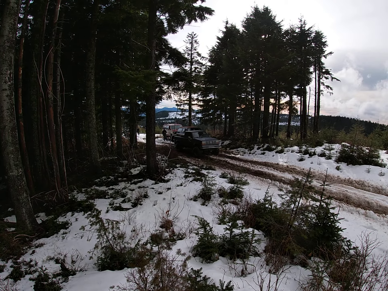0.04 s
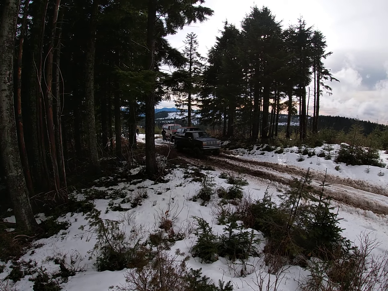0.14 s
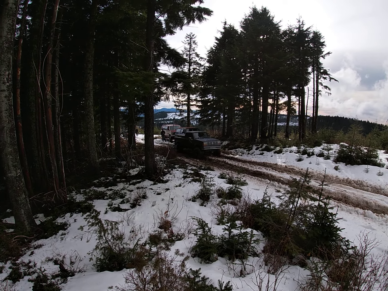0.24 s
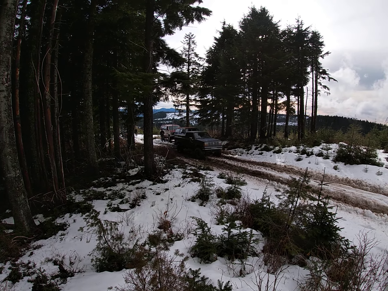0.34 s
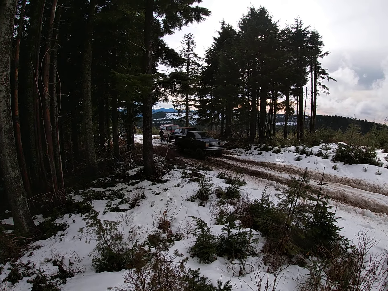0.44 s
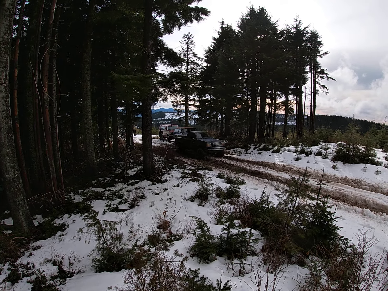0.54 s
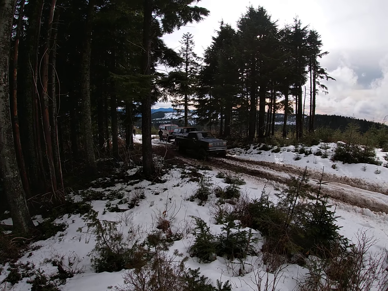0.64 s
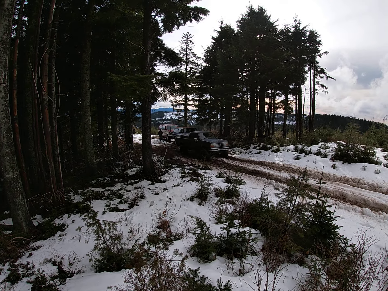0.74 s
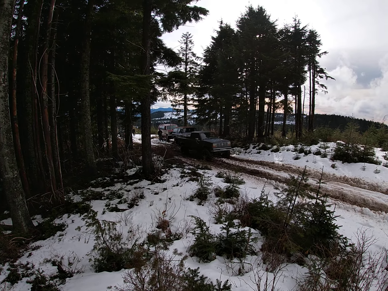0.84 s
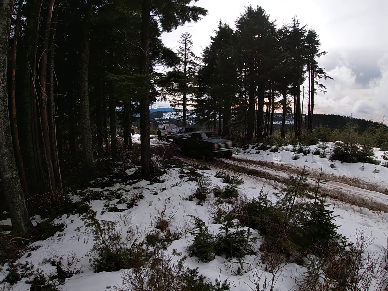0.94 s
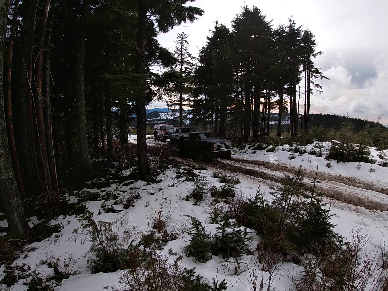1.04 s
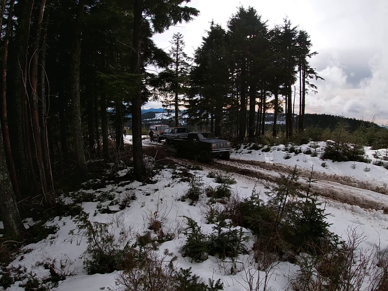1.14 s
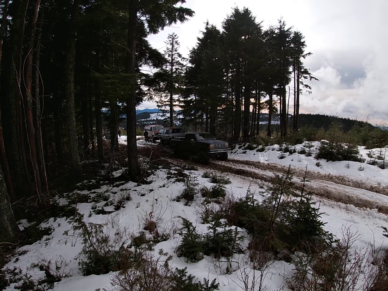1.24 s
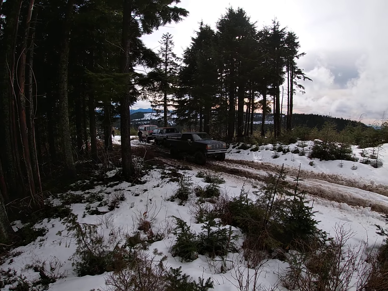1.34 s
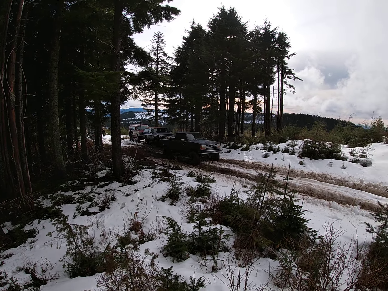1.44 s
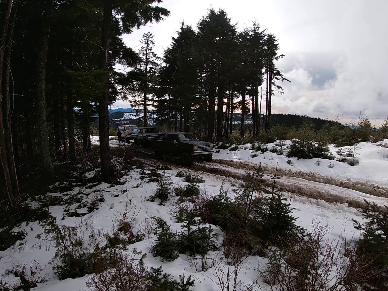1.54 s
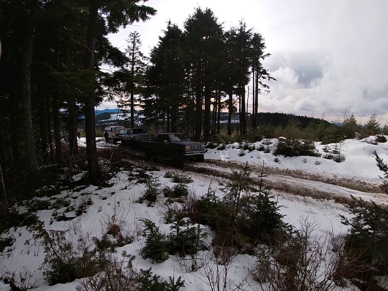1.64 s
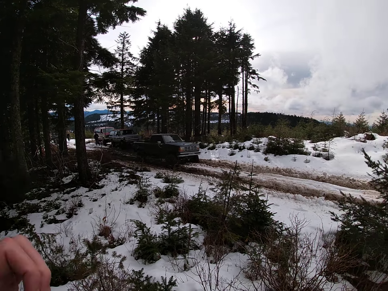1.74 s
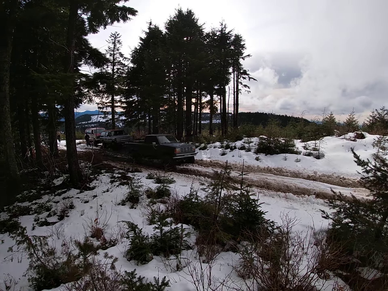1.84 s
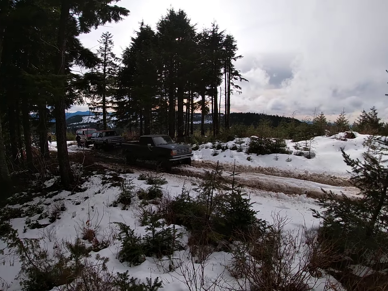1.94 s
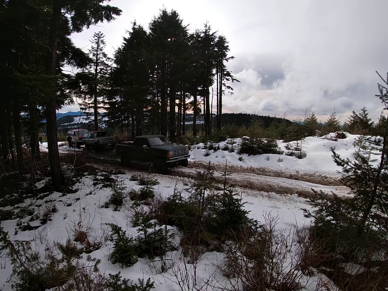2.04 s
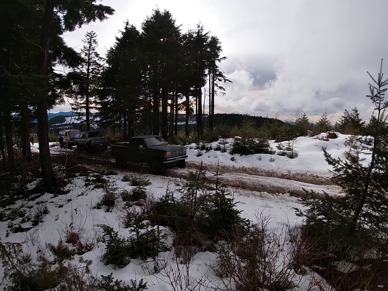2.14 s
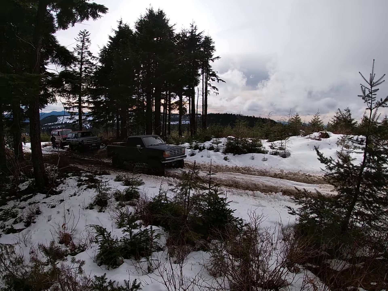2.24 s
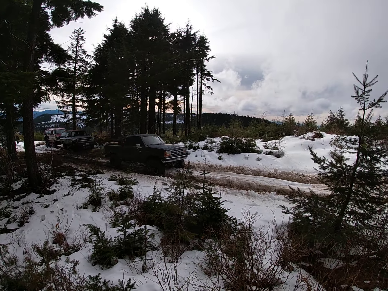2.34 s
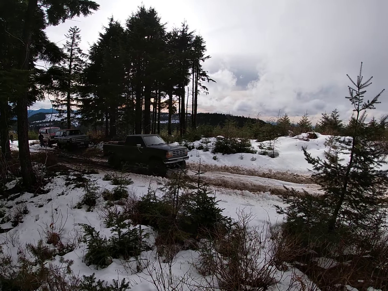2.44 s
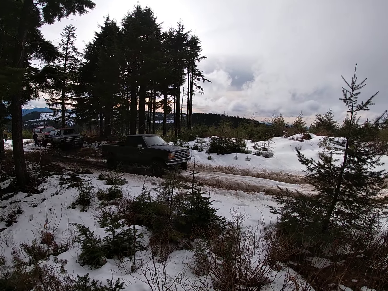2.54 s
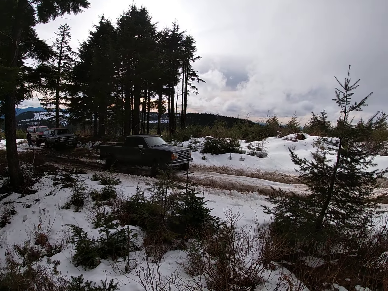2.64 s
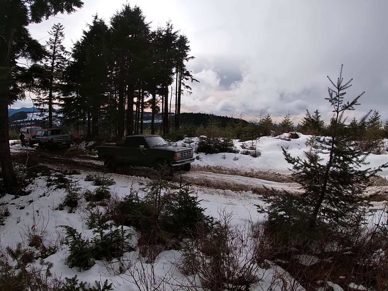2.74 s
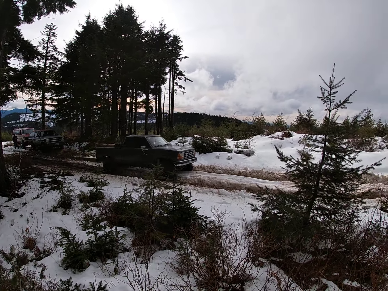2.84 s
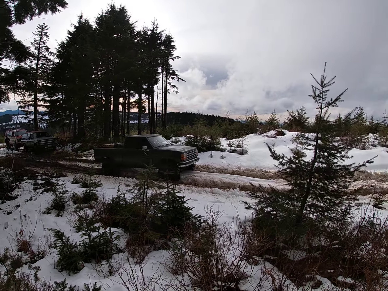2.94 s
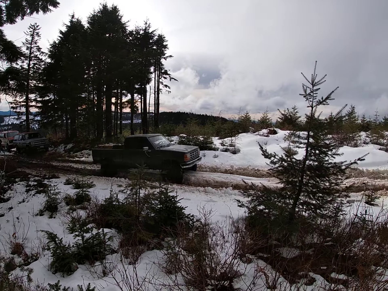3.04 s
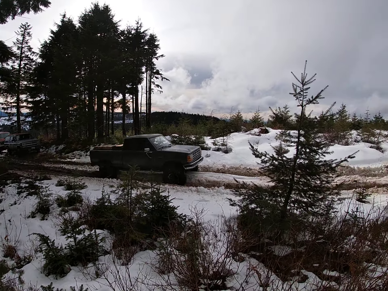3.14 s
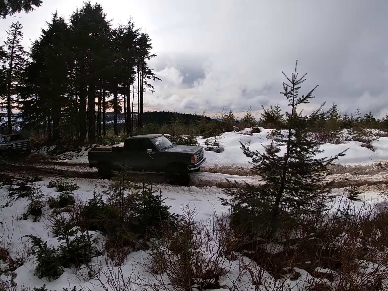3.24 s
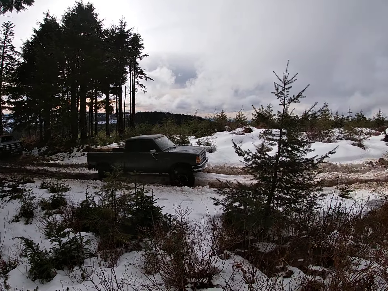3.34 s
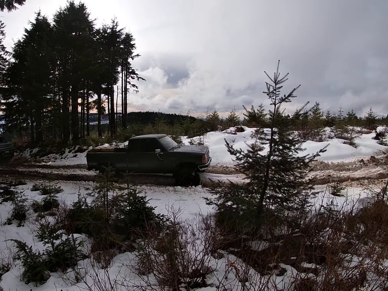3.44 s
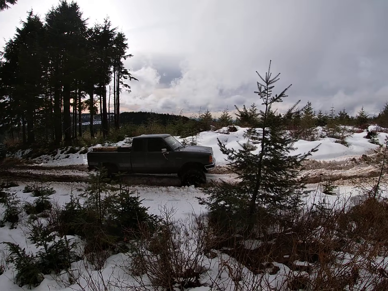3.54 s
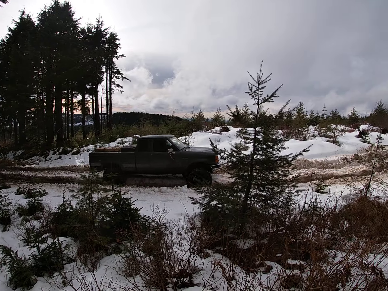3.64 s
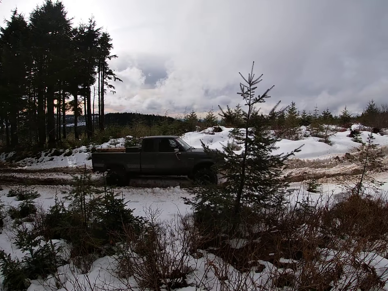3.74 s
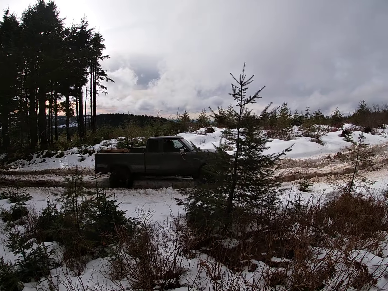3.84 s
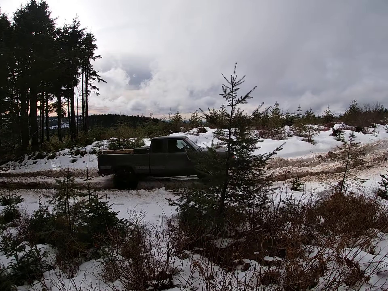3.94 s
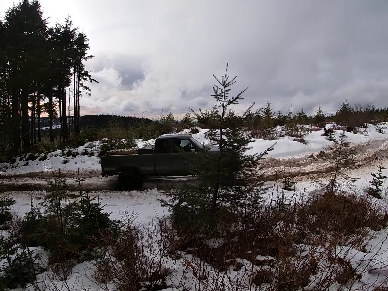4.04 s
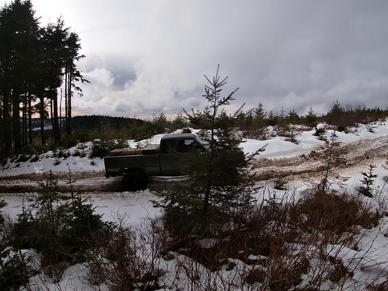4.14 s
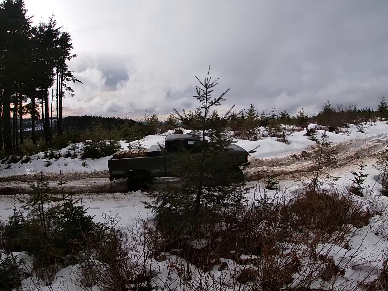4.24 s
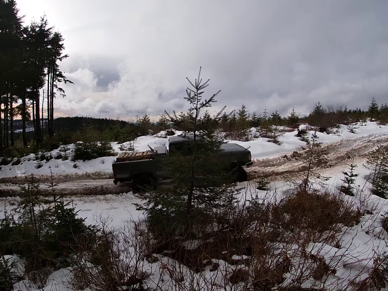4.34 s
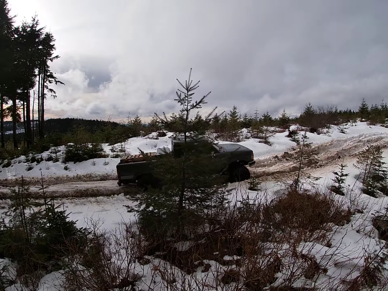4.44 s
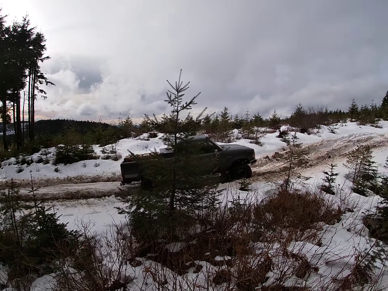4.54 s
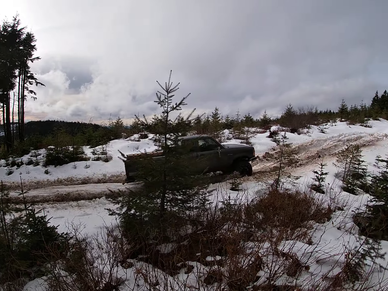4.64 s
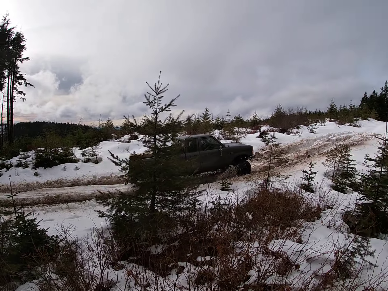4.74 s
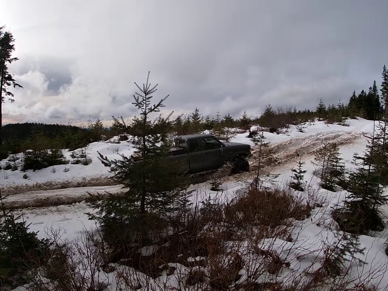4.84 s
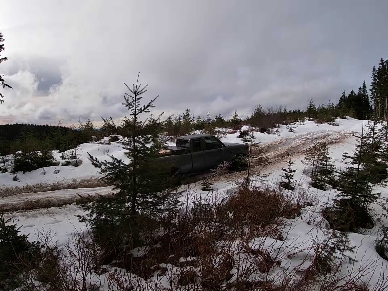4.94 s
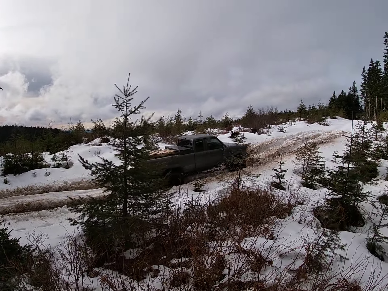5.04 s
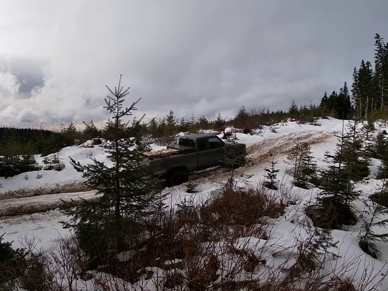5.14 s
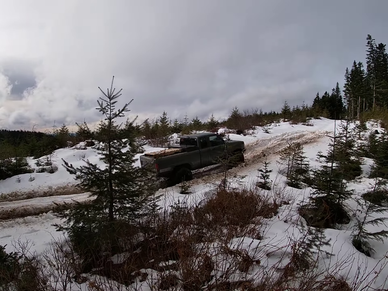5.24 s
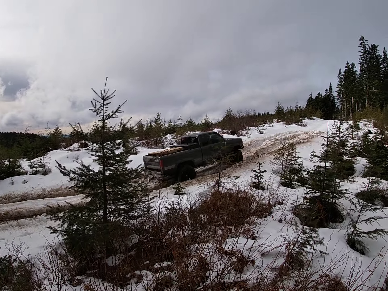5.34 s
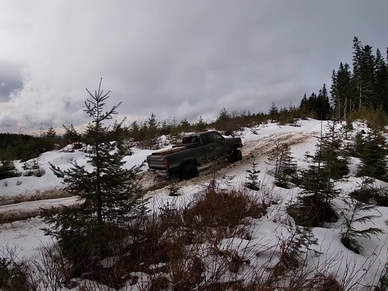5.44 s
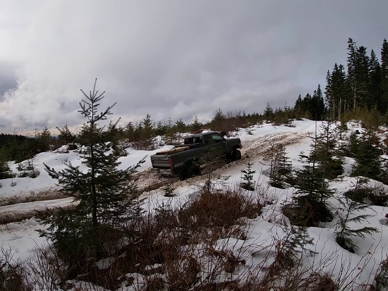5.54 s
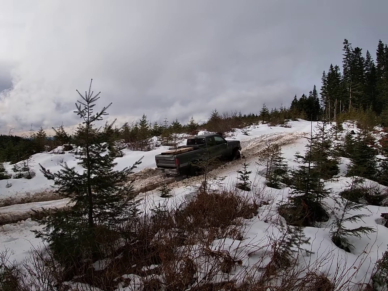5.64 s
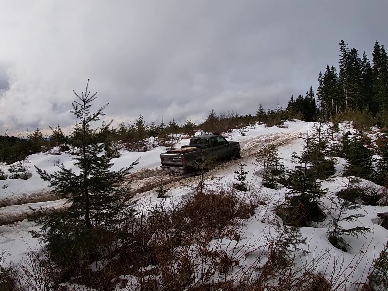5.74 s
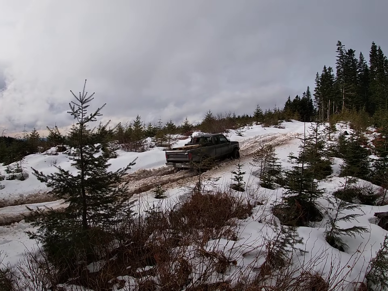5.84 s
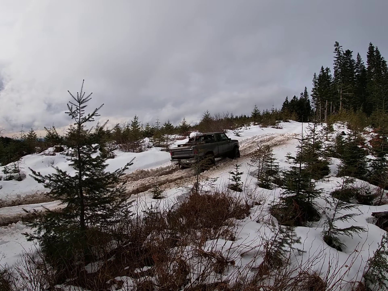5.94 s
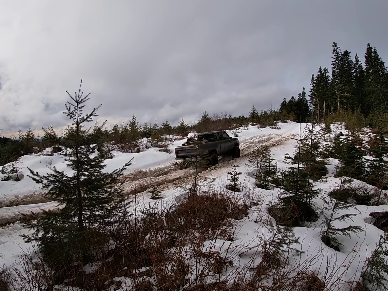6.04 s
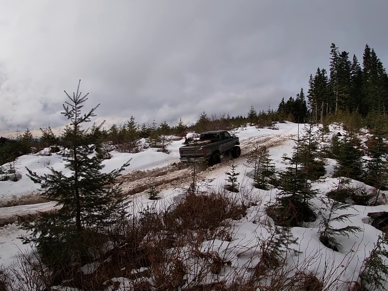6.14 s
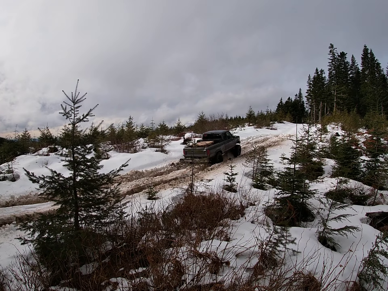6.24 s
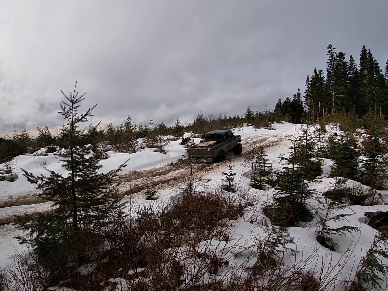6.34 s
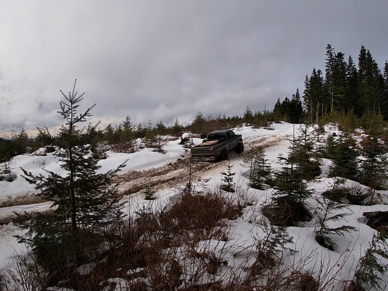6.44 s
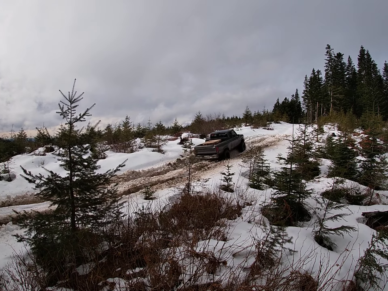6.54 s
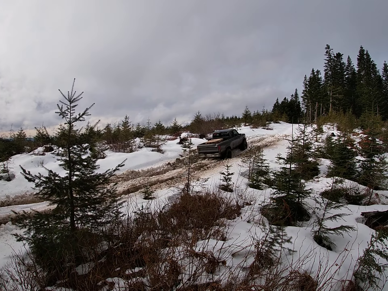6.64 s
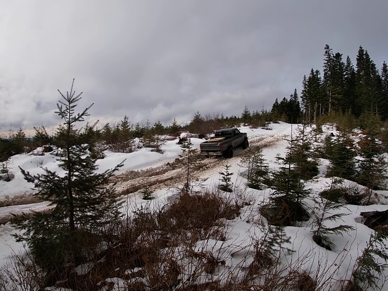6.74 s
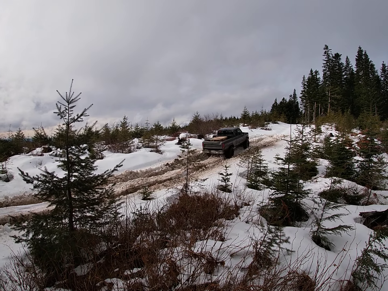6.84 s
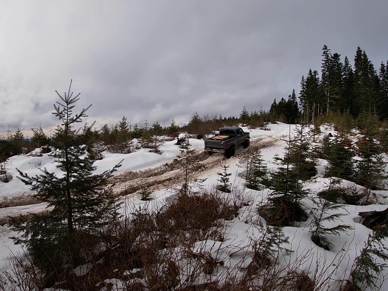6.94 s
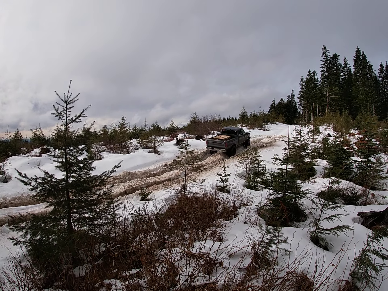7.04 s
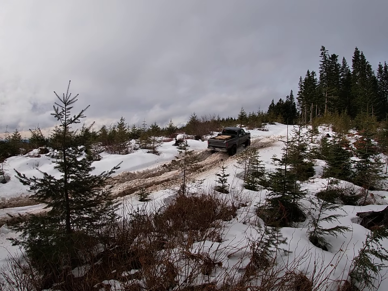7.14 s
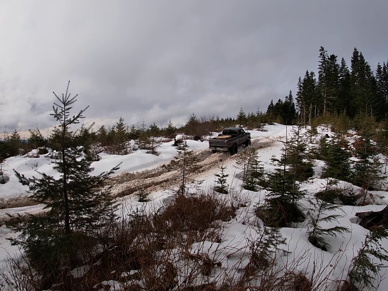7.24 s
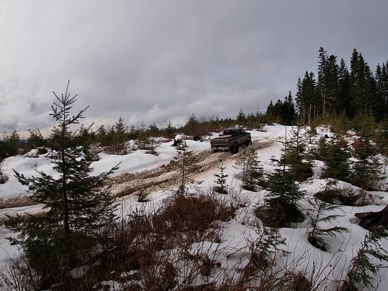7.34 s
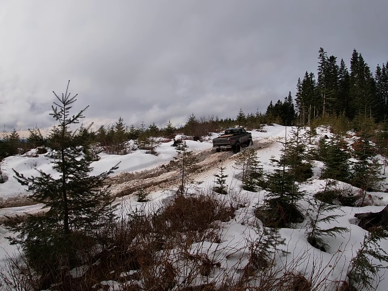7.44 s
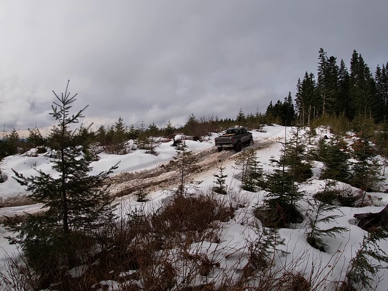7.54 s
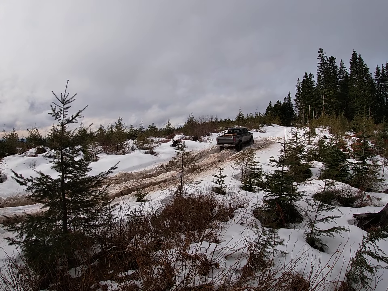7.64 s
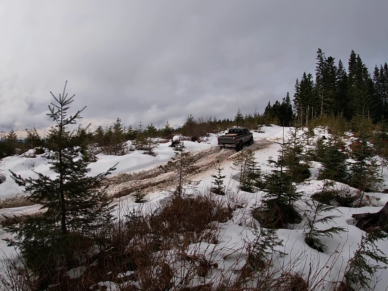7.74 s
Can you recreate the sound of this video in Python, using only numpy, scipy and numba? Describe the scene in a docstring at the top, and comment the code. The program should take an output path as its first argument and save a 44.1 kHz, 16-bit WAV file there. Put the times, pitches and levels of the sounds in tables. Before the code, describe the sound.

Outdoors on a snowy track, a truck engine labours at low revs with a deep boom, then rises in repeated bursts of throttle as it drives past the microphone. Its tyres spray slush and a light wind buffets underneath. The exhaust cracks now and then, barks at the hardest rev and turns rough and uneven as the truck climbs away, still revving.

```python
"""Pickup on a slushy track

A six-cylinder pickup ploughs along a forest track, passes and climbs away, revving up and down.
Each time a cylinder fires, the exhaust gets a push and the engine rasps. The pushes blend into a
deep boom, and because the cylinders are uneven, the pipe barks and throbs.
Tyres churn wet snow, and a light wind buffets the microphone."""
import sys
import numpy as np
from scipy import signal
from scipy.fft import rfft, irfft
from scipy.io import wavfile
from scipy.ndimage import uniform_filter1d
from numba import njit

SR = 44100
rng = np.random.default_rng(int(sys.argv[2]) if len(sys.argv) > 2 else 0)


def master_out(mix):
    """Clip the mix to full scale and print it as 16-bit PCM to the path in sys.argv[1]."""
    frames = np.transpose(np.atleast_2d(mix))
    ceiling = np.clip(frames, -1, 1)
    pcm = np.round(ceiling * 32767).astype(np.int16)
    wavfile.write(sys.argv[1], SR, pcm)


N = 343539


def undb(db):
    """Turn decibels into a number to multiply by."""
    return 10 ** (np.asarray(db) / 20)


def unit(x):
    """Scale a sound to a standard strength (rms 1)."""
    return x / np.sqrt(np.mean(x ** 2))


def curves(table):
    """Join a timed table's rows with straight lines: one curve for each column after the time."""
    times, *columns = np.transpose(table)
    return [np.interp(np.arange(N) / SR, times, column) for column in columns]


def wander(rate):
    """A smooth random wobble that heads somewhere new about `rate` times a second."""
    steps = rng.standard_normal(8192)
    hold = max(int(SR / rate), 48)
    return unit(uniform_filter1d(uniform_filter1d(steps[np.arange(N) // hold], hold), hold))


def colour(x, points, size=16384):
    """Shape a sound's bass and treble along (Hz, dB) points; it comes out at standard strength."""
    hz, db = np.transpose(points)
    log_hz = np.log(np.fft.rfftfreq(size, 1 / SR) + 1)
    log_gain = np.log(undb(np.interp(log_hz, np.log(hz), db)))
    # Make the filter ring only after a hit, never before it.
    cepstrum = irfft(log_gain, size)
    cepstrum[1:size // 2] *= 2
    cepstrum[size // 2 + 1:] = 0
    response = irfft(np.exp(rfft(cepstrum)), size)
    return unit(signal.fftconvolve(x, response)[:N])


def ring(x, modes):
    """Let a sound ring at fixed pitches, each given as (Hz, width in Hz, relative dB)."""
    return unit(sum(undb(db) * signal.lfilter(*signal.iirpeak(hz, hz / width, fs=SR), x)
                    for hz, width, db in modes))


@njit
def moving_band(x, hz, width_hz):
    """Keep the part of a sound near a moving pitch (a state-variable filter)."""
    out, band, low = np.empty(len(x)), 0., 0.
    for i in range(len(x)):
        tuning, damping = np.tan(np.pi * hz[i] / SR), width_hz / hz[i]
        now = (band + tuning * (x[i] - low)) / (1 + tuning * (tuning + damping))
        band, low = 2 * now - band, low + 2 * tuning * now
        out[i] = damping * now
    return out


def eased(times, values):
    """A curve through the given points that slows down near each one."""
    place = np.interp(np.arange(N) / SR, times, np.arange(len(times)))
    share = place % 1
    blend = share + .85 * ((1 - np.cos(np.pi * share)) / 2 - share)
    return np.interp(place - share + blend, np.arange(len(times)), values)


# Presses of the pedal. Each row: foot down, full effort and foot off, all in seconds,
# then firings per second before, firings per second reached, effort in dB.
PRESSES = [(0.0, 0.055, 0.47, 79.37, 80.35, -1.5), (1.199, 1.268, 1.61, 65.95, 74.33, 1.5),
           (1.797, 1.86, 1.87, 74.8, 82.9, 4), (2.13, 2.297, 2.56, 84.64, 95.6, 0.3),
           (2.638, 2.72, 2.92, 95.46, 104, 2.5), (3.127, 3.189, 3.24, 96.95, 101.8, 3),
           (3.3, 3.423, 3.5, 102.6, 118.5, 2), (3.73, 3.95, 3.98, 112.7, 130.1, 2.5),
           (4.329, 4.49, 4.62, 119, 143.7, 2), (4.938, 5.068, 5.2, 128.9, 141.1, 3.5),
           (5.45, 5.779, 5.94, 123.1, 168, 10), (6.182, 6.469, 6.71, 119.1, 162.2, 5.5),
           (6.717, 6.79, 6.82, 159.7, 155.7, 0), (7.119, 7.55, 7.46, 130.4, 165.9, 3)]

def throttle(attack_s=0.29, release_s=0.16, coast_hz_per_s=52):
    """Presses wind the revs up; the engine's effort swells, holds and falls when the foot lifts."""
    down, full, off, from_hz, to_hz, peak_db = np.transpose(PRESSES)
    t = np.arange(N) / SR
    in_turn = lambda a, b: np.column_stack([a, b]).ravel()
    last_hz = to_hz[-1] - coast_hz_per_s * (t[-1] - off[-1])
    hz = eased(np.append(in_turn(down, off), t[-1]), np.append(in_turn(from_hz, to_hz), last_hz))
    effort_db = sum(db * np.clip(1 + np.minimum((t - start) / attack_s, (end - t) / release_s), 0, 1)
                    for start, end, db in zip(full, off, peak_db))
    return hz, effort_db


# How roughly the engine runs. Each row: time in seconds, throb in dB against the deep note,
# unevenness of the firings from 0 to 1.
ROUGHNESS = [(0, -7, 0.27), (.7, -13, 0.2), (1.2, -5.5, 0.3), (1.85, -3, .4), (2.0, -11, .1),
             (4.8, -11, 0.05), (5.4, -8.5, 0.1), (5.8, -4, 0.3), (6.15, -11, 0.2), (6.65, -1.5, 0.22),
             (6.86, -4.5, .25), (6.98, -4, 0.7), (7.2, -4.5, 0.8), (7.5, -7.5, 0.2)]
# The tones in the throb. Each row: vibrations per engine cycle (six firings),
# relative level in dB at low revs, the same at high revs.
THROB_TONES = [(2, -16, -11.5), (3, -9.5, 3), (4, -7, -7.5), (5, -20.5, -5.5), (7, -31.5, -12.5),
               (8, -31, -25), (9, 2, -3.5), (10, -16.5, -12), (11, -12.5, -10), (13, -18, -21.5),
               (14, -12.5, -34), (15, -4.5, -16), (16, -19, -23), (17, -17.5, -24.5), (19, -19, -22),
               (20, -19.5, -20.5), (22, -24.5, -20), (23, -30, -24), (24, -22.5, -20)]
# How the silencer passes overtones. Each row: frequency in Hz, level in dB against the deep note.
SILENCER = [(130, -15), (160, -9.5), (175, -2.5), (193, -4.5), (210, -16.5), (250, -22.5), (290, -22.5),
            (340, -20), (375, -22.5), (425, -19.5), (480, -29.5)]
# The overtone at three times the firing rate. Each row: time in seconds, extra level in dB.
THIRD_HARMONIC = [(0, -5.5), (2.25, -10), (2.48, 1), (2.8, -1.5), (2.95, -16), (4.92, -20), (5.2, 0),
                  (5.45, -9), (6.2, 2.5), (6.5, -9.5), (7.79, -10)]
# The boom's loudness. Each row: time in seconds, level in dB.
BOOM_LEVEL = [(0, -14), (2.95, -15), (3.6, -13.5), (4.95, -13.5), (5.7, -15.5), (6.0, -14.5), (6.22, -16),
              (6.35, -16.5), (7.1, -19.5), (7.6, -21), (7.79, -18.5)]

def boom(firings, hz):
    """The firings blend into a deep note; unequal cylinder banks add a throb between its overtones."""
    throb_db, uneven = curves(ROUGHNESS)
    third_db, = curves(THIRD_HARMONIC)
    level_db, = curves(BOOM_LEVEL)
    # Revs falling by 10 Hz a second mean the throttle is shut, which thins the octave.
    shut = uniform_filter1d(np.clip(-np.gradient(hz) * SR / 10, 0, 1), size=4000)
    octave = undb(np.interp(2 * hz, *np.transpose(SILENCER)) - 5.5 * shut)
    third = undb(np.interp(3 * hz, *np.transpose(SILENCER)) + third_db)
    angle = 2 * np.pi * firings + 0.16 * uneven * wander(70)
    lowest = np.sin(angle) * (1 + 0.15 * uneven * wander(60))
    note = lowest + octave * np.sin(2 * angle) + third * np.sin(3 * angle)
    revs = np.clip((hz - 92) / 28, 0, 1)  # 0 at low revs, 1 at high revs
    throb = 0
    for multiple, low_db, high_db in THROB_TONES:
        phase = 2 * np.pi * rng.random() + .7 * wander(5)
        tone = np.sin(round(multiple) * angle / len(CYLINDERS) + phase)
        throb += tone * undb(low_db + revs * (high_db - low_db) + 2.7 * wander(12))
    strength = np.sqrt(1 + octave ** 2 + undb(throb_db) ** 2)
    return -undb(level_db) * (np.sqrt(2) * note + unit(throb) * undb(throb_db)) / strength


# The six cylinders in firing order. Each row: strength in dB,
# lateness as a share of the gap between firings.
CYLINDERS = [(-3, 0.0064), (-3.5, 0.084), (-2.5, 0.017), (-4, .16), (-2.5, 0.011), (-2.5, 0.067)]

def firing_sizes(firings, scatter_db):
    """How strong each firing is: its cylinder's own strength plus a little chance."""
    strength_db, _ = np.transpose(CYLINDERS)
    count = firings.astype(int)
    chance = np.clip(rng.standard_normal(size=4096), -2, 2)
    return undb(strength_db[count % len(CYLINDERS)] + scatter_db * chance[count])


def cycle_noise(firings, repeat_share, size=1536):
    """Noise that partly repeats with every engine cycle, which gives it closely spaced overtones."""
    place = firings / len(CYLINDERS) % 1 * size
    pattern = unit(np.interp(place, np.arange(size), rng.standard_normal(size)))
    return np.sqrt(repeat_share) * pattern + np.sqrt(1 - repeat_share) * rng.standard_normal(N)


def exhaust_flow(firings, gas_share):
    """Each firing sends a pulse and a puff of gas; unequal pipes and uneven burning make them limp."""
    _, lateness = np.transpose(CYLINDERS)
    _, uneven = curves(ROUGHNESS)
    late = np.interp(firings, np.arange(len(CYLINDERS)), lateness, period=len(CYLINDERS))
    late += .04 * uneven * wander(50)
    arrived = np.maximum(firings - late, 0)
    size = firing_sizes(arrived, scatter_db=2.2 + 0.78 * uneven)
    pulses = np.diff(np.floor(arrived), prepend=0) * size
    gas = cycle_noise(firings, repeat_share=.55) * size * np.exp(-(arrived % 1) / 2.5)
    return unit(pulses) + gas_share * unit(gas)


# Two bands of sound that shift as the truck turns and passes. Each row: time in seconds,
# centre of the bark's hollow band in Hz, centre of the rasp's bright band in Hz.
BANDS = [(0, 417, 1357), (1.75, 421, 1400), (2.1, 653, 1640), (2.28, 633, 1694), (2.42, 660, 1095),
         (2.8, 635, 1034), (3.15, 463, 1060), (3.5, 457, 1224), (4.05, 514, 1295), (4.5, 566, 968),
         (4.85, 680, 875), (5.15, 443, 1070), (5.5, 480, 1052), (5.8, 600, 968), (6.2, 363, 888),
         (6.55, 615, 940), (7.1, 597, 868), (7.79, 624, 916)]
# The exhaust pipe's tone from ahead and from behind. Each row: frequency in Hz, relative level in dB.
PIPE_AHEAD = [(150, -53), (260, -13), (340, 2.5), (410, 3), (520, -2), (650, -1.5), (780, -1), (950, -6),
              (1200, -14), (2000, -23), (4000, -50.5), (12000, -90.5)]
PIPE_REAR = [(150, -40.5), (250, -5), (310, 7.5), (400, 4.5), (490, -3.5), (610, -3), (740, -7),
             (900, -1.5), (1150, -13.5), (2000, -21.5), (4000, -50.5), (12000, -89)]

def bark(firings, rear):
    """The firings make the pipe ring, with one hollow band standing out above a dip."""
    hollow_hz, _ = curves(BANDS)
    flow = exhaust_flow(firings, gas_share=1.1)
    ahead = colour(flow, PIPE_AHEAD)
    dipped = unit(ahead - 0.72 * moving_band(ahead, .66 * hollow_hz, width_hz=100.))
    pipe = (1 - rear ** 2) * dipped + rear ** 2 * colour(flow, PIPE_REAR)
    hollow = np.sqrt(2) * unit(moving_band(pipe, hollow_hz, width_hz=216.))
    return undb(-1) * unit(pipe + hollow)


def howl(firings, hz, effort_db, rear):
    """Overtones sing out as they glide through the two bands, loudest at the hardest pull."""
    hollow_hz, bright_hz = curves(BANDS)
    near = lambda tone_hz, centre_hz, reach_hz: 1 / (1 + ((tone_hz - centre_hz) / reach_hz) ** 2)
    out = 0
    for halves in range(5, 15):
        multiple = halves / 2
        hollow = near(multiple * hz, hollow_hz, reach_hz=49.4) * undb(-11 * (halves % 2))
        bright = near(multiple * hz, bright_hz, reach_hz=70) * undb(-7) * rear
        tone = np.sqrt(2) * np.sin(2 * np.pi * multiple * firings + .6 * wander(25))
        out += (hollow + bright) * tone * undb(2.0 * wander(12))
    slack = np.clip((10 - effort_db) / 2, 0, 1)  # 1 up to 8 dB of effort, 0 at 10 dB
    return out * undb(-6 - 15.5 * slack)


# The truck's tone from the front, the side and behind. Each row: frequency in Hz, relative level in dB.
FRONT_TONE = [(400, -29.5), (700, -1.5), (900, 2.5), (1000, 2.5), (1380, -0.5), (1750, -3), (2200, -7),
              (3100, -12), (3450, -23.5), (4000, -15), (6400, -24.5), (7500, -41), (10000, -45),
              (12000, -70)]
SIDE_TONE = [(400, -24.5), (750, -5), (1000, -4.5), (1250, -5.5), (1550, -7.5), (2000, -10.5), (2600, -13),
             (3400, -17), (4200, -33.5), (7000, -37), (12000, -72.5)]
REAR_TONE = [(400, -24.5), (700, -6.5), (940, 1), (1170, -6.5), (1400, 3), (1620, -7), (1850, -2),
             (2120, -10.5), (2330, -8.5), (2550, -11), (3200, -11), (4200, -22), (7000, -41.5),
             (12000, -67)]

def rasp(firings, front, side, rear):
    """Engine clatter and gas hiss swell with each firing; their tone depends on which side faces us."""
    _, bright_hz = curves(BANDS)
    knock = unit(firing_sizes(firings, scatter_db=5.0) * np.exp(-(firings % 1) / 0.41))
    puff = unit(firing_sizes(firings, scatter_db=4.5) * np.exp(-(firings % 1) / 1.9))
    clatter = colour(rng.standard_normal(N) * (1.7 + knock), FRONT_TONE)
    hiss = cycle_noise(firings, repeat_share=.5) * (1.0 + puff)
    beside = colour(hiss, SIDE_TONE)
    behind = unit(colour(hiss, REAR_TONE) + undb(3.5) * snarl(firings))
    body = undb(-0.3) * front * clatter + undb(0.5) * side * beside + undb(1.87) * rear * behind
    bright = unit(moving_band(body, bright_hz, width_hz=130.))
    return undb(-1.5) * (body + undb(-8.5) * bright)


# Wetter and drier stretches of track. Each row: time in seconds, spray level in dB without effort.
SPRAY_LEVEL = [(0, -56.5), (1.4, -61), (1.9, -61.5), (2.35, -58.5), (2.8, -54.5), (3.7, -47), (4.8, -47.5),
               (5.45, -49.5), (5.9, -52.5), (6.12, -52.5), (6.4, -50.5), (6.65, -52.5), (6.95, -46),
               (7.12, -53), (7.35, -62), (7.79, -55)]
# A wheel drops into a puddle. Each row: middle in seconds, length in seconds, level in dB.
SPLASHES = [(0.35, .07, -61), (1.25, 0.078, -54), (6.82, 0.12, -48)]
# The tone of wet snow. Each row: frequency in Hz, relative level in dB.
SLUSH_TONE = [(300, -1.5), (1000, -1), (2500, -1), (4000, 1), (5500, -2.5), (7000, -5), (7600, -10.5),
              (8200, -17), (9000, -12), (9700, -10.5), (10500, -14.5), (11300, -25), (13000, -28),
              (15000, -52.5)]

def slush(effort_db):
    """The tyres spray wet snow, a hiss full of tiny splats that grows as the engine pulls."""
    spray_db, = curves(SPRAY_LEVEL)
    splashes = sum(undb(db) * swell(middle, length) for middle, length, db in SPLASHES)
    level = np.hypot(undb(spray_db + 0.88 * effort_db), splashes)
    splats = (rng.random(N) < 2000 / SR) * rng.standard_normal(N)  # about 2000 a second
    spray = rng.standard_normal(N) + 0.81 * unit(splats)
    return level * colour(spray * undb(0.79 * wander(25)), SLUSH_TONE)


def swell(middle_s, length_s):
    """A brief bell-shaped rise and fall."""
    return np.exp(-2 * ((np.arange(N) / SR - middle_s) / length_s) ** 2)


# Gusts of wind. Each row: time in seconds, relative level in dB.
GUSTS = [(0, -31), (0.8, -33), (1.5, -29.5), (2.7, -34.5), (3.1, -29), (4.3, -33), (5.1, -33), (6.1, -29.5),
         (7.05, -24), (7.45, -31), (7.79, -30)]
# The wind's rumble. Each row: frequency in Hz, relative level in dB.
WIND_TONE = [(10, -1), (25, 4.5), (50, 10), (90, 3.5), (160, 0.5), (250, -1.5), (400, -22.5), (900, -50.5),
             (4000, -82.5)]

def wind():
    """Swirls of air tumble over the microphone and make it rumble."""
    gust_db, = curves(GUSTS)
    return undb(gust_db + 3) * colour(rng.standard_normal(N) * undb(wander(12)), WIND_TONE)


# One bank of cylinders knocking. Each row: time in seconds, level in dB.
KNOCK_LEVEL = [(0, -58.5), (.7, -46), (1.0, -56), (1.17, -53), (1.33, -45), (1.83, -46), (2.05, -53),
               (2.4, -81)]
# How a knock rings. Each row: pitch in Hz, width in Hz, relative level in dB.
KNOCK_RING = [(950, 600, 1), (1370, 170, -1)]

def knocking(firings):
    """While the engine labours at low revs, every second firing knocks: a soft, even rattle."""
    level_db, = curves(KNOCK_LEVEL)
    fade = np.exp(-(firings / 2 % 1) / .19)
    knocks = rng.standard_normal(N) * firing_sizes(firings, scatter_db=2.5) * fade
    band = signal.butter(2, [550, 2400], "bandpass", fs=SR, output="sos")
    return undb(level_db) * unit(signal.sosfilt(band, ring(knocks, KNOCK_RING)))


# Sharp exhaust pops. Each row: start in seconds, peak level in dB, pitch in Hz.
POPS = [(0.894, -26, 1250), (0.977, -27, 1000), (1.005, -27.5, 1000), (1.364, -22.5, 950),
        (1.449, -28, 900), (1.478, -29, 1300), (1.616, -26.5, 1000), (1.671, -26, 950), (1.777, -25, 900),
        (1.831, -30, 1650), (2.003, -29.5, 1150), (2.637, -26, 850), (3.789, -22, 950), (5.077, -24, 800),
        (5.791, -17, 1000), (6.466, -20, 950), (7.315, -24, 950)]

def pops(width_hz=450, decay_s=.0025):
    """Now and then a firing cracks harder than the rest."""
    out, length = np.zeros(N), int(SR / 20)
    dull = signal.butter(3, 2200, fs=SR, output="sos")
    for start_s, db, hz in POPS:
        puff = rng.standard_normal(length) * np.exp(-np.arange(length) / SR / decay_s)
        band = [(hz, width_hz, 0)]
        crack = signal.sosfilt(dull, ring(ring(puff, band), band))
        start = int(start_s * SR)
        out[start:start + length] += undb(db) * crack / abs(crack).max()
    return out


# A thin whine. Each row: time in seconds, pitch in Hz, level in dB.
WHINE = [(1.9, 1558, -75), (2.0, 1595, -55), (2.15, 1630, -56), (2.28, 1680, -50), (2.37, 1707, -75)]

def whine():
    """A faint, unsteady whine climbs in pitch as the truck comes closer."""
    hz, db = curves(WHINE)
    level = np.sqrt(2) * undb(db + 2.0 * wander(30))
    wavering_hz = hz * (1 + .028 * wander(200))
    return level * np.sin(2 * np.pi * np.cumsum(wavering_hz) / SR)


# How the tailpipe and load bed ring. Each row: pitch in Hz, width in Hz, relative level in dB.
TAILPIPE_RING = [(1387, 130, 8), (1770, 100, -1.5), (2104, 82, -10), (2470, 110, -12)]

def snarl(firings):
    """From behind, the open tailpipe rings at every firing; one more ring follows the bright band."""
    _, bright_hz = curves(BANDS)
    flow = exhaust_flow(firings, gas_share=.7)
    ringing = ring(flow, TAILPIPE_RING) + undb(5) * unit(moving_band(flow, bright_hz, width_hz=150.))
    band = signal.butter(2, [700, 3200], "bandpass", fs=SR, output="sos")
    return unit(signal.sosfilt(band, ringing))


# The tone of a sputter. Each row: frequency in Hz, relative level in dB.
BURBLE_TONE = [(35, 0.5), (85, 3.5), (230, -10), (380, -9), (550, -19), (1000, -31), (4000, -59.5),
               (12000, -110)]

def burble(per_second=560, decay_s=0.0017):
    """Unburnt fuel sputters in the tailpipe as soft thumps."""
    sputters = (rng.random(N) < per_second / SR) * 1.
    fades = signal.lfilter([1], [1, -np.exp(-1 / (decay_s * SR))], sputters)
    return colour(fades * rng.standard_normal(N), BURBLE_TONE)


# The drone of the engine under load. Each row: time in seconds, level in dB.
DRONE_LEVEL = [(2.9, -54), (3.15, -45), (3.7, -43), (4.05, -37.5), (4.35, -44), (4.55, -40), (4.8, -52),
               (5.2, -43), (5.5, -48.5), (6.4, -47), (6.6, -46), (6.88, -40), (7.0, -54), (7.3, -48),
               (7.5, -44.5), (7.79, -40)]

def drone(firings):
    """The overtone at four times the firing rate stands out, rough in level and pitch."""
    level_db, = curves(DRONE_LEVEL)
    angle = 4 * 2 * np.pi * firings + .4 * wander(70)
    return np.sqrt(2) * undb(level_db + 2.0 * wander(40)) * np.sin(angle)


# Hard barks at the top of the big rev. Each row: middle in seconds, length in seconds,
# pitch in Hz, level in dB.
HARD_BARKS = [(5.78, .11, 1200, -31), (5.907, 0.05, 1620, -30)]

def hard_barks(firings, width_hz=1140):
    """At full effort the firings twice crack into a hard, bright bark."""
    flow = exhaust_flow(firings, gas_share=.7)
    out = 0
    for middle, length, hz, db in HARD_BARKS:
        band = [(hz, width_hz, 0)]
        out += undb(db) * swell(middle, length) * ring(ring(flow, band), band)
    return signal.sosfilt(signal.butter(2, 3600, fs=SR, output="sos"), out)


# The drive past. Each row: time in seconds, side facing us (0 front, 1 side, 2 rear),
# then the relative levels of bark and rasp in dB, before effort is added.
DRIVE_PAST = [(0, 0.058, -37, -39.5), (0.25, 0.049, -44, -38), (1.05, 0.044, -43.5, -42),
              (1.17, 0.073, -44.5, -44), (1.28, .06, -46, -42), (1.85, 0.12, -43, -43),
              (2.03, 0.24, -43.5, -40), (2.3, 0.79, -38, -42), (2.78, 1.03, -35.5, -45.5),
              (2.95, 0.87, -39.5, -43.5), (3.25, 0.77, -38.5, -43.5), (4.05, 0.59, -33, -37),
              (4.3, 0.67, -32.5, -40), (4.48, 1.1, -31.5, -40), (4.72, 0.89, -34, -39.5),
              (5.0, 1.18, -34.5, -44), (5.45, 1.39, -33, -41), (6.18, 1.804, -35, -41.5),
              (6.88, 1.71, -30, -36.5), (7.2, 1.9, -37, -38.5), (7.55, 1.69, -37, -37),
              (7.79, 1.76, -36, -34.5)]

def scene():
    """The throttle drives the engine and spins the tyres in the slush, while the wind blows."""
    hz, effort_db = throttle()
    firings = np.cumsum(hz) / SR  # firings so far; the fraction is the way to the next one
    facing, bark_db, rasp_db = curves(DRIVE_PAST)
    front, side, rear = (np.sqrt(np.clip(1 - abs(facing - view), 0, 1)) for view in range(3))
    _, uneven = curves(ROUGHNESS)
    # From behind, uneven firing swings the level once an engine cycle and at random.
    stumble = uneven * rear
    lurch = undb(stumble * (1.5 * np.cos(2 * np.pi * firings / len(CYLINDERS)) + 2.5 * wander(20)))
    deep = lurch * boom(firings, hz)
    pipe_level = undb(bark_db + 0.37 * effort_db)
    pipe = pipe_level * (bark(firings, rear) + howl(firings, hz, effort_db, rear)) + drone(firings)
    sputter = undb(-21) * stumble * lurch * burble()
    cracks = pops() + knocking(firings) + hard_barks(firings)
    engine = undb(rasp_db + effort_db) * rasp(firings, front, side, rear) + whine()
    return (deep + pipe + sputter + cracks + engine + slush(effort_db) + wind())[None]


def record(dry, top_hz=15000):
    """Round off the loudest peaks and cut the highest treble."""
    rounded = np.tanh(0.6 * dry) / 0.59
    return signal.sosfilt(signal.ellip(8, .2, 70, top_hz, fs=SR, output="sos"), rounded)


dry = scene()
out = record(dry)
master_out(out)
```